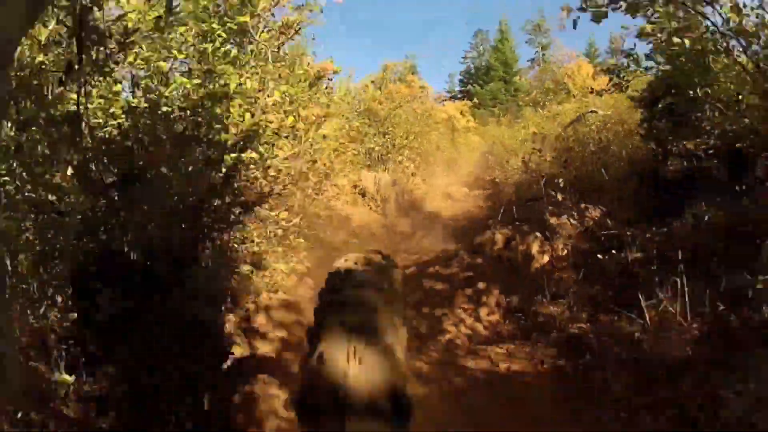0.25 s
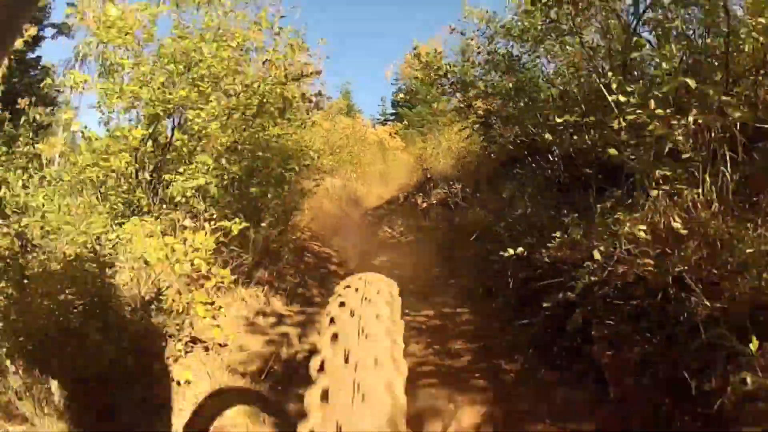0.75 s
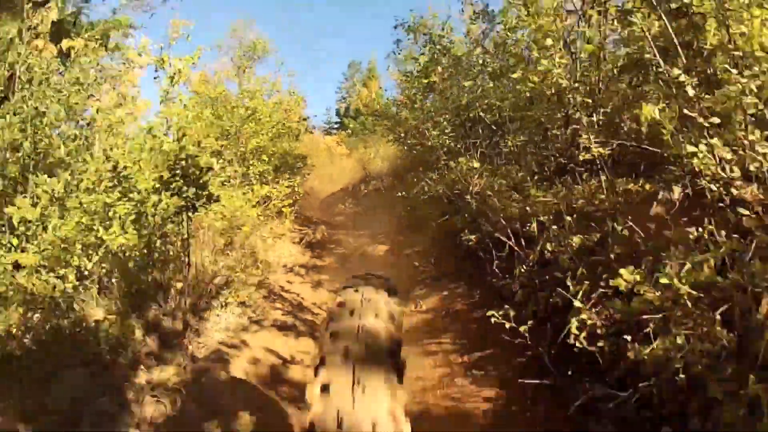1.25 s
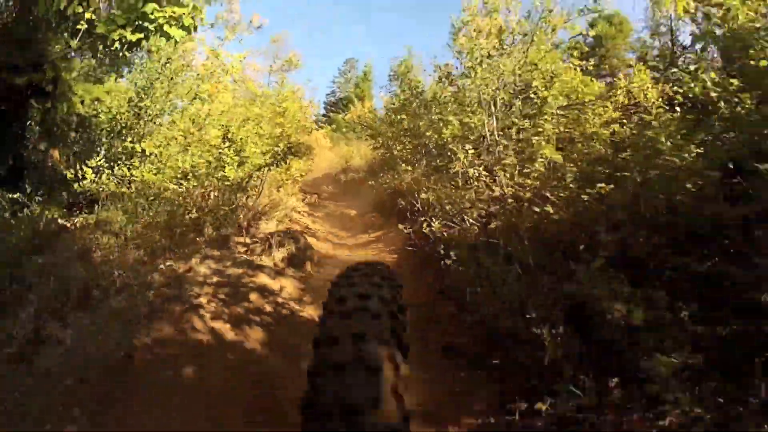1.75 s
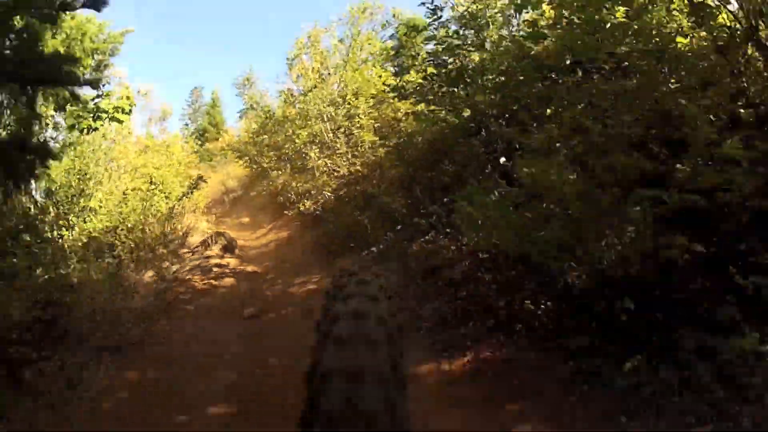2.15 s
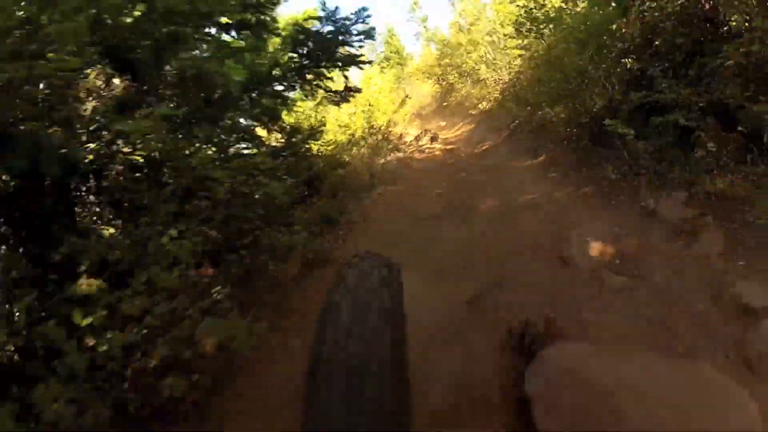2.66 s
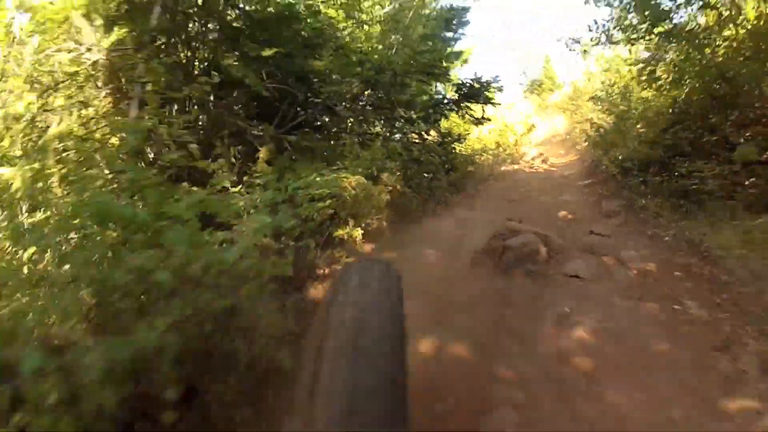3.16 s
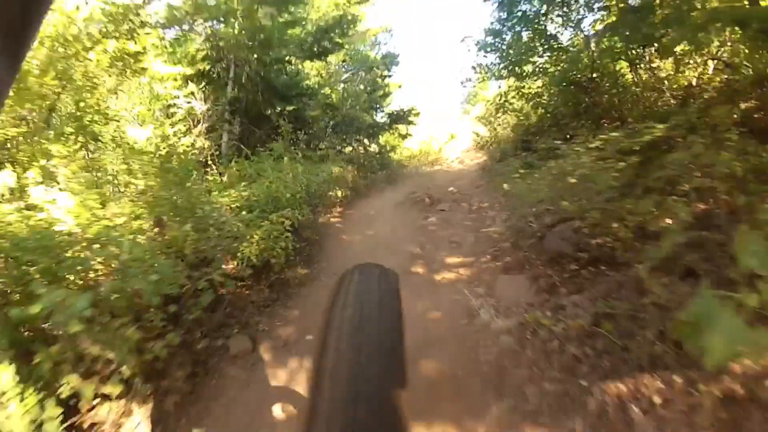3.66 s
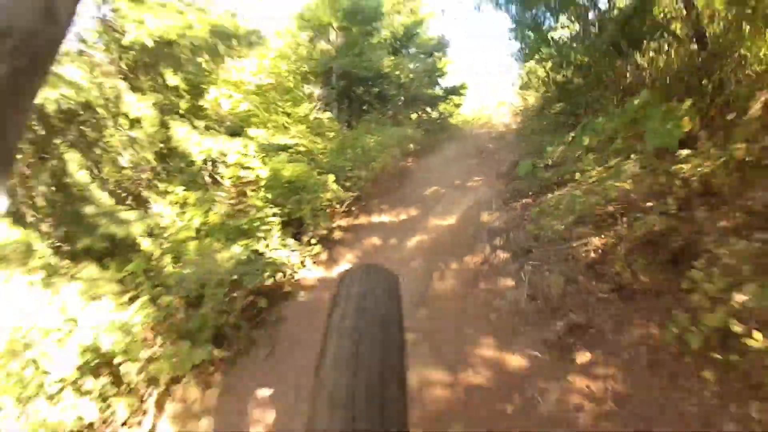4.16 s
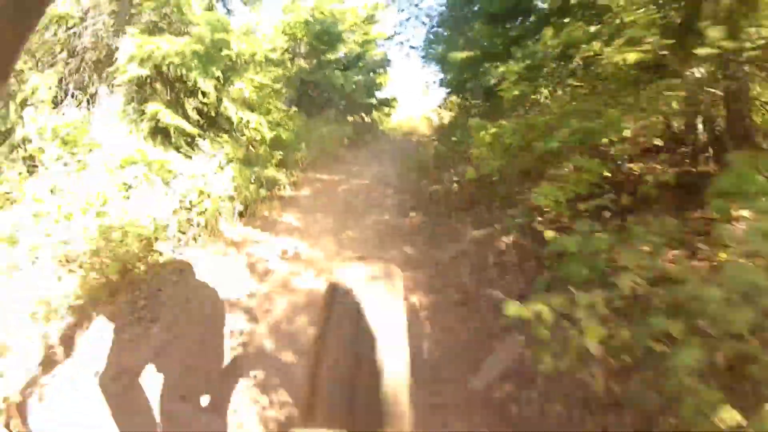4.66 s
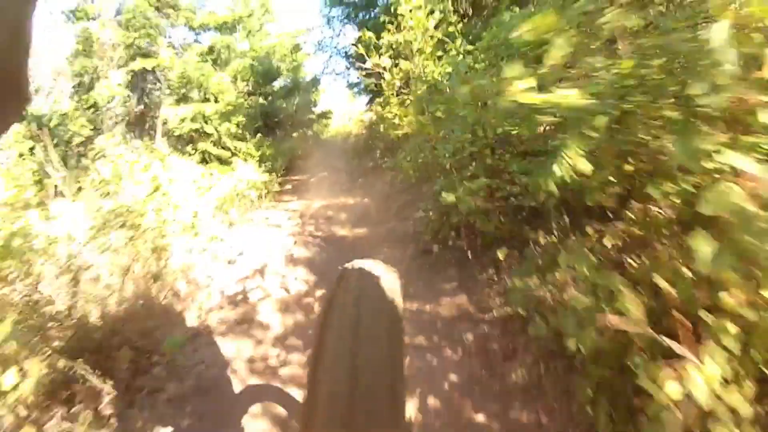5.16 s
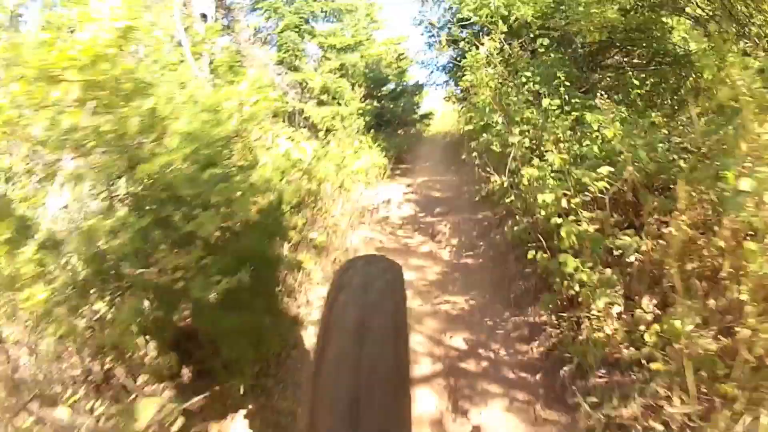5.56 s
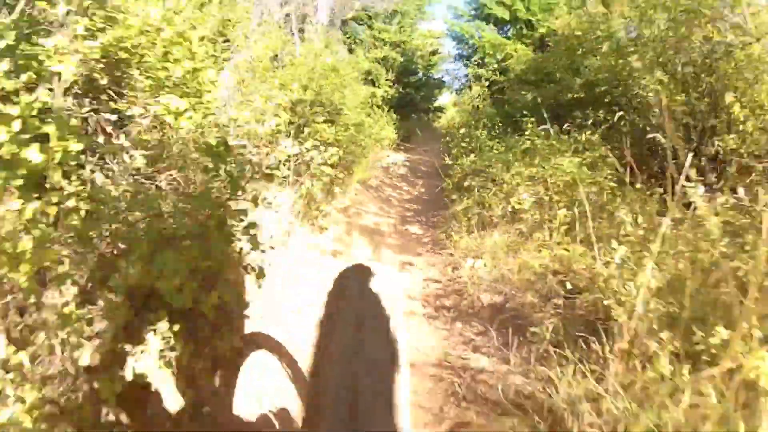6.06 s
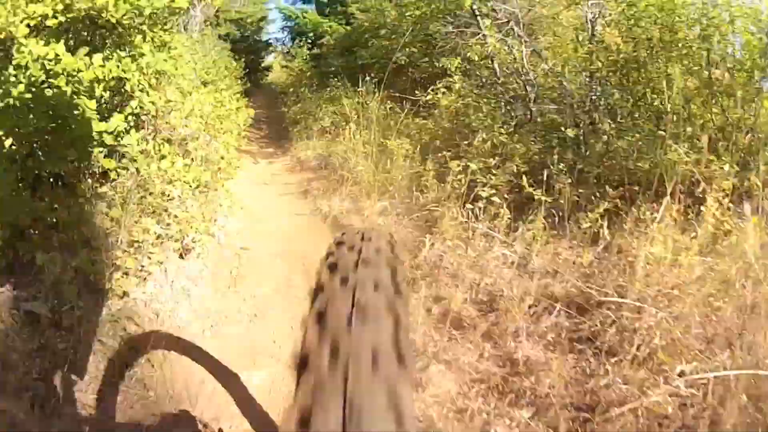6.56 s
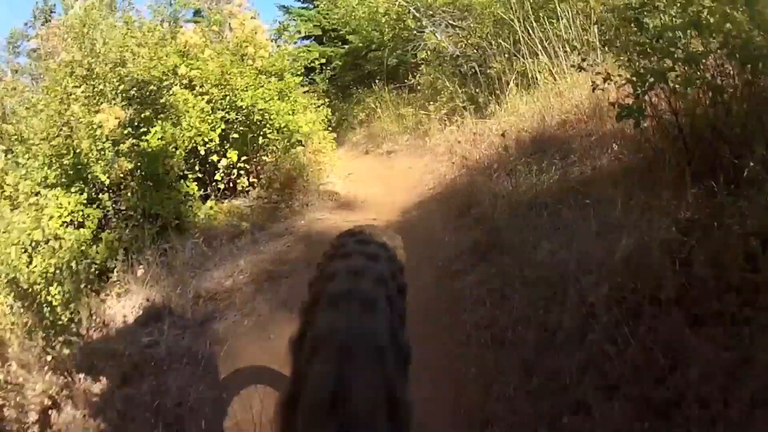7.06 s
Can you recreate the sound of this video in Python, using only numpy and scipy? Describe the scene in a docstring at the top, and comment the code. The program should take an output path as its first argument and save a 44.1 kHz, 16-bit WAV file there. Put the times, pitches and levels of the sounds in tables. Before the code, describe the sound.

A bicycle rolls fast over a dry dirt trail for about seven seconds, heard close from a microphone mounted on it. The tyre makes a continuous hollow rumble with a gravelly crunch, swelling around 1.5 and 2 seconds, over a low shudder from the bike. Loose parts clack and ring metallically from the start, in dense, uneven clusters until about 2.7 seconds and again from 4 to 5.8. Bumps knock the microphone's plastic case throughout, some with a dull thud, hardest around 1.1, 1.6, 3, 3.7, 4.6 and 6.6 seconds. The tyre briefly scrapes the dirt near 0.3, 1.9, 4.4 and 5.6 seconds. Wind buffets the microphone in low gusts, with a short push at 2.7 seconds. From about 6 seconds it grows stronger and briefly flutters while the rattles thin out, with one more sharp clatter at 7 seconds.

```python
"""A bicycle tyre rumbles and crunches down a dry dirt trail, heard from a camera riding on the bike.
Bumps come up through the frame and make the camera's plastic case ring. Loose parts rattle,
the tyre scrapes the dirt, the frame shakes, and wind buffets the microphone.
The camera turns itself down after loud blows. It also samples slowly and holds each sample,
which mirrors the sound into the treble."""
import sys
import numpy as np
from scipy import signal
from scipy.fft import rfft, irfft
from scipy.io import wavfile
from scipy.ndimage import uniform_filter1d

SR = 44100
rng = np.random.default_rng(int(sys.argv[2]) if len(sys.argv) > 2 else 0)


def generate_wav(signal):
    """Clip the signal to [-1, 1] and save it as 16-bit WAV at the path in sys.argv[1]."""
    frames = np.transpose(np.atleast_2d(signal))
    scaled = np.clip(frames, -1, 1) * 32767
    pcm = np.round(scaled).astype(np.int16)
    wavfile.write(sys.argv[1], SR, pcm)


N = 321930
T = np.arange(N) / SR

# How loud the tyre is along the trail: time_s, rumble_db, crunch_db
TYRE_LEVELS = [(0.0, -27, -34), (0.43, -21.5, -28.5), (0.69, -23.5, -33), (1.3, -18.5, -31.5),
               (1.57, -16.5, -25.5), (1.77, -24, -33), (2.01, -16.5, -25), (2.22, -23.5, -35),
               (2.5, -21.5, -28.5), (2.91, -23.5, -33), (3.39, -21.5, -29), (3.94, -23, -33.5),
               (4.11, -22, -32.5), (4.41, -19, -29.5), (4.74, -22.5, -32), (5.0, -22.5, -31),
               (5.22, -26.5, -29), (5.35, -29.5, -38.5), (5.57, -22.5, -30.5), (5.77, -22.5, -33),
               (6.04, -22.5, -31.5), (6.38, -21.5, -32.5), (6.69, -22.5, -35.5), (7.3, -20.5, -30)]
# The tone of crunching gravel: pitch_hz, level_db
GRAVEL_SPECTRUM = [(80, -53), (150, -11), (400, -19), (1000, -41), (1700, -10), (2450, -15), (3300, -22),
                   (4300, -31.5), (5950, -69)]
# The tone of hissing dust: pitch_hz, level_db
DUST_SPECTRUM = [(1500, -37), (2800, -7), (3700, 10), (4400, -14), (5200, 8), (6500, -23)]
# Bumps that knock the case: time_s, peak_db, push_hz, thud_db (the thud peaks thud_db + 10 above peak_db)
BUMPS = [(0.021, -12, 656, -32.5), (0.051, -8, 875, -43.5), (0.338, -16.5, 720, -6), (0.363, -17, 706, -1),
         (0.528, -10.5, 727, -18.5), (0.66, -2.5, 673, -18), (0.836, -11, 686, -17), (1.076, 0.5, 695, -51),
         (1.155, -8.5, 660, -20.5), (1.238, -5.5, 770, -25), (1.252, 0, 765, -29), (1.476, -5.5, 664, -19),
         (1.597, 0.5, 678, -47), (1.83, -11, 710, -20), (1.903, -13, 686, -25), (1.969, -4, 653, -28),
         (2.856, -5, 655, -24.5), (2.962, -6, 710, -22.5), (3.019, 2.5, 718, -29), (3.291, -7.5, 674, -19),
         (3.522, -13.5, 656, -10), (3.704, 1.5, 761, -17), (3.757, 0.5, 783, -48), (3.988, -1, 768, -13.5),
         (4.323, -2.5, 595, -25), (4.387, -5.5, 673, -23), (4.567, -3, 890, -15.5), (4.631, 3.5, 796, -30),
         (4.804, -7, 657, -40), (4.874, 0, 744, -22), (4.932, -5.5, 693, -43), (5.159, -3, 690, -28),
         (5.416, 0.5, 748, -41), (5.626, -6.5, 697, -17.5), (5.81, -3.5, 677, -13), (6.011, 0, 675, -34),
         (6.391, -8, 710, -26.5), (6.566, 1.5, 730, -21.5), (6.753, -2.5, 647, -21),
         (6.767, -2, 657, -22.5), (6.812, -7, 657, -20), (6.908, -8, 730, -10), (7.283, -3, 687, -15.5)]
# The louder slaps of loose parts: start_s, metal_peak_db, clack_above_metal_db
SLAPS = [(0.0189, -21, 14.5), (0.0298, -16, 5), (0.0486, -1, -1), (0.1096, -16, 3), (0.1519, -10, -7),
         (0.2039, -14, 4.5), (0.2158, -19.5, 8.5), (0.2404, -15.5, -10), (0.2728, -16, 2.5),
         (0.3232, -13, 2), (0.3519, -7, -2), (0.3614, -24.5, 19), (0.408, -20.5, 8), (0.4489, -14, -4),
         (0.4627, -8.5, 4.5), (0.5202, -15, -6), (0.5511, -17, -1.5), (0.5717, -17, 1.5),
         (0.6549, -23.5, 12), (0.666, -2.5, -4.5), (0.7796, -20.5, 4.5), (0.8335, -6, -3.5),
         (0.893, -15, -2), (0.94, -22.5, 9.5), (1.0051, -5, 0), (1.3892, -14, -3), (1.514, -12.5, 3),
         (1.732, -16, 2), (1.8161, -33, 17.5), (1.8257, -23, 18.5), (1.8392, -5, -5), (1.925, -13.5, 5),
         (1.9602, -13, 3.5), (1.985, -8, 0.5), (1.9936, -11.5, 3), (2.0628, -12.5, 3.5), (2.115, -4, -9),
         (2.1241, -18.5, 6.5), (2.134, -11, -5.5), (2.16, -17.5, 2.5), (2.1903, -17, 6), (2.2054, -10, 0.5),
         (2.4005, -27.5, 19.5), (2.4177, -4, -5), (2.4797, -18, 9), (2.5461, -14, 7), (2.6042, -6.5, -10.5),
         (2.6389, -5, -6), (2.6625, -2.5, -3.5), (2.758, -20, 11.5), (2.9163, -15.5, -10.5),
         (3.1757, -16, 4.5), (3.2204, -14.5, 5.5), (3.2874, -24.5, 12), (3.3413, -18, -4),
         (3.4035, -16, -15.5), (3.5179, -23, 10.5), (3.7031, -12, 8), (3.9811, -18, 14), (4.004, -8, 2),
         (4.0637, -17, 2.5), (4.151, -10, -1), (4.2117, -14, -5.5), (4.3027, -17, 0), (4.3274, -18, 11.5),
         (4.384, -18.5, 3.5), (4.566, -14, 14.5), (4.621, -14.5, 8), (4.645, -11, -0.5),
         (4.7431, -16.5, -23), (4.7681, -24, 4), (4.796, -9.5, 0), (4.8709, -16, 7.5), (4.8862, -19, 8),
         (4.9365, -9, -1), (5.021, -12, -15.5), (5.0714, -8, 2.5), (5.1493, -19.5, 11.5), (5.1621, -3, 2),
         (5.2625, -9, -2), (5.327, -16, 5), (5.3502, -16.5, -1), (5.3902, -16.5, 1), (5.4063, -12, -1),
         (5.4136, -10.5, -1), (5.5281, -18, -9), (5.6101, -5.5, -4), (5.662, -9.5, 3.5), (5.7917, -13, -3),
         (6.1452, -34.5, 19), (6.4075, -24, 9.5), (6.535, -25, 9.5), (6.9098, -21, 9), (6.9306, -9, 1.5),
         (6.9935, -32.5, 19), (7.0376, -2.5, 1.5)]
# The tyre scraping the dirt: start_s, length_s, level_db
SCRAPES = [(0.333, 0.11, -25.5), (1.933, 0.12, -27), (4.438, 0.082, -30), (5.605, 0.078, -24)]

# A mode is a pitch at which a thing rings; the narrower it is, the longer it rings.
# Modes of the plastic case: pitch_hz, width_hz, level_db
CASE_MODES = [(662, 43, 0.5), (755.6, 32.7, -3.5), (848, 108, -8.5), (330.7, 31, -17.5), (1182, 22, -13.5)]
# Modes of the dull thud under a bump: pitch_hz, width_hz, level_db
THUD_MODES = [(171, 46, 2.5), (346, 16.3, 2.5), (469, 24.5, 2.5)]
# Modes of the clack of loose parts: pitch_hz, width_hz, level_db
CLACK_MODES = [(1305, 386, -9.5), (2028, 206, 4), (2122, 200, 2.5), (2492, 210, 2.5), (3022, 71, -3.5)]
# Modes of ringing metal: pitch_hz, width_hz, level_db
METAL_MODES = [(3468, 116, 19.5), (4010, 190, 7), (4722, 197, 11.5), (5280, 120, 1), (5090, 130, 7.5)]

# How loud the low 73 Hz rumble is (frame shake, plus wind buffeting during gusts): time_s, level_db
LOW_RUMBLE_LEVELS = [(0.0, -34), (0.04, -16.5), (0.14, -43), (0.32, -27.5), (0.87, -32.5), (1.0, -20),
                     (1.22, -30), (1.46, -16), (1.67, -35.5), (1.71, -24), (1.95, -19.5), (2.01, -36),
                     (2.56, -27.5), (4.92, -29), (5.06, -21.5), (5.16, -42.5), (5.9, -16.5), (6.1, -26),
                     (6.24, -20), (6.63, -24.5), (7.03, -20), (7.05, -37), (7.26, -26), (7.3, -27)]
# The tone of wind on the microphone: pitch_hz, level_db
WIND_SPECTRUM = [(18, -4), (30, -14.5), (42, -0.5), (55, -10), (100, -12.5), (180, -18), (320, -23),
                 (600, -56)]
# How loud the wind is on the microphone: time_s, level_db
GUST_LEVELS = [(0.0, -25.5), (0.26, -38), (0.32, -23), (0.43, -39), (1.0, -26), (1.24, -29), (1.44, -34),
               (2.62, -28), (2.66, -12.5), (2.7, -34.5), (3.17, -21), (3.58, -20.5), (4.11, -36),
               (4.33, -22), (4.37, -38), (5.61, -30.5), (5.9, -21.5), (6.46, -17.5), (6.75, -17.5),
               (6.79, -23.5), (7.03, -15), (7.08, -19), (7.26, -13), (7.3, -28.5)]


def tyre():
    """Tread and stones jolt the case in small uneven kicks; gravel crunches in clumps over hissing dust."""
    kicks = rng.standard_normal(N) * flicker(db=2.22, ms=5.5) * flicker(db=2.23, ms=25)
    rumble = unit_level(ring(filtered(kicks, [300, 1500], "bandpass"), CASE_MODES))
    grit = shaped_noise(GRAVEL_SPECTRUM) * flicker(db=2.8, ms=4) * flicker(db=2.6, ms=20)
    gravel = unit_level(grit + 0.071 * ring(grit, CLACK_MODES + METAL_MODES))
    crunch = gravel + gain_of(-15.5) * shaped_noise(DUST_SPECTRUM)
    rumble_db, crunch_db = level_curve(TYRE_LEVELS), level_curve(TYRE_LEVELS, column=2)
    return gain_of(rumble_db) * rumble + gain_of(crunch_db) * crunch


def bumps():
    """Each bump gives a short, rough push, then the case rings on over a dull thud."""
    out, t = np.zeros(N), T[:3000]
    swell = np.exp(-((t - 0.008) / 0.0029) ** 2)
    for time_s, peak_db, push_hz, thud_db in BUMPS:
        grit = rng.standard_normal(len(t))
        push = (np.sin(2 * np.pi * push_hz * t) + 0.46 * grit) * swell
        soft_push = uniform_filter1d(push, size=21)
        thud = ring(uniform_filter1d(grit * swell, size=45), THUD_MODES)
        start_s = time_s - 0.005
        add(out, start_s, peak_db, ring(soft_push, CASE_MODES) + 0.9 * soft_push)
        add(out, start_s, peak_db + thud_db + 10, thud)
    return out


def rattles():
    """Loose parts slap: each dry snap with a gritty tail sets off a metal ring, a clack and the case."""
    out, t = np.zeros(N), T[:2500]
    snap = (np.exp(-t / 0.0042) + 0.47 * np.exp(-t / 0.0077)) * np.minimum(t / 0.00022, 1)
    for start_s, metal_db, clack_above_db in SLAPS + small_slaps():
        blow = snap * rng.standard_normal(len(t))
        shifts = rng.standard_normal((len(CLACK_MODES), 2))
        metal = ring(blow, struck(METAL_MODES, shifts))
        clack = ring(blow, struck(CLACK_MODES, shifts[::-1]))
        clack_db = metal_db + clack_above_db
        add(out, start_s, metal_db, metal + 0.3 * filtered(blow, [2500, 5600], "bandpass"))
        add(out, start_s, clack_db, clack + 0.12 * filtered(blow, [900, 3000], "bandpass"))
        add(out, start_s, clack_db + 0.5, ring(blow, CASE_MODES))
    return out


def small_slaps():
    """Quiet slaps at random moments, more of them on loose gravel; rows as in SLAPS."""
    tries, usual_per_s, usual_crunch_db = 400, 16, -33
    when, chance, size, clack = rng.random((tries, 4)).T
    start_s = when * T[-1]
    crunch_db = level_curve(TYRE_LEVELS, column=2)[(start_s * SR).astype(int)]
    per_s = usual_per_s * gain_of(1.1 * (crunch_db - usual_crunch_db))
    metal_db = -30.5 - 2.5 * np.log(1 - 0.95 * size)
    clack_above_db = 4 + 5 * (2 * clack - 1)
    happens = chance < per_s * T[-1] / tries
    return list(np.transpose([start_s, metal_db, clack_above_db])[happens])


def scrapes():
    """The tyre scrapes the dirt: short bursts of dense grit set the clack modes ringing."""
    grit = rng.standard_normal(N) * flicker(db=4.2, ms=2.6)
    bursts = sum(gain_of(db) * arch(start_s, length_s) for start_s, length_s, db in SCRAPES)
    return bursts * unit_level(ring(grit, CLACK_MODES))


def low_rumble():
    """A low rumble: the frame shaking at its lowest mode, plus wind buffeting during gusts."""
    pitch_hz, narrow_hz, wide_hz = 73, 13, 40
    rumble = ring(rng.standard_normal(N), [(pitch_hz, narrow_hz, 0)])
    rumble = ring(rumble, [(pitch_hz, wide_hz, 0)])
    return gain_of(level_curve(LOW_RUMBLE_LEVELS)) * steadied(rumble, ms=47)


def wind():
    """Gusts press on the microphone in low, lumpy pushes."""
    air = steadied(shaped_noise(WIND_SPECTRUM), ms=77)
    air = air + 0.12 * (air ** 2 - 1)  # pushes are taller than dips
    air = filtered(air, 25, "highpass")  # the microphone drops the slowest part
    return gain_of(level_curve(GUST_LEVELS)) * unit_level(air)


def wind_flutter():
    """During one strong gust the air beats almost evenly on the microphone."""
    beat_hz = 40.98 * flicker(db=1.2, ms=40.4)
    phase = 2 * np.pi * np.cumsum(beat_hz) / SR
    beats = unit_level(np.cos(phase) + 0.25 * np.cos(2 * phase))
    return gain_of(-15) * arch(start_s=5.97, length_s=0.76) * flicker(db=1.6, ms=30) * beats


def ring(x, modes):
    """Lets x set the modes ringing; each one dies away by itself."""
    out = np.zeros(len(x))
    for k, (pitch_hz, width_hz, db) in enumerate(modes):
        decay = np.exp(-np.pi * width_hz / SR)
        turn = np.exp(2j * np.pi * pitch_hz / SR)
        ringing = 2 * signal.lfilter([1 - decay], [1, -decay * turn], x).real
        out += (-1) ** k * gain_of(db) * ringing
    return out


def struck(modes, shifts):
    """Every blow lands somewhere new, so the modes shift a little in pitch and strength."""
    return [(hz * (1 + 0.009 * pitch_shift), width_hz, db + 2.64 * level_shift)
            for (hz, width_hz, db), (pitch_shift, level_shift) in zip(modes, shifts)]


def shaped_noise(spectrum):
    """Noise with the tone given by a spectrum table."""
    pitch_hz, level_db = np.transpose(spectrum)
    all_hz = np.fft.rfftfreq(N, 1 / SR)
    all_db = np.interp(np.log(all_hz + 1), np.log(pitch_hz + 1), level_db)
    return unit_level(irfft(rfft(rng.standard_normal(N)) * gain_of(all_db), N))


def flicker(db, ms):
    """A multiplier that wanders by about db decibels over about ms milliseconds."""
    width = round(ms * SR / 1000)
    drift = uniform_filter1d(uniform_filter1d(rng.standard_normal(N), width), width)
    return gain_of(db * unit_level(drift))


def steadied(x, ms):
    """Softens the chance swells of a noise over about ms milliseconds."""
    nearby_power = uniform_filter1d(x ** 2, round(ms * SR / 1000))
    return unit_level(x / np.sqrt(nearby_power + 0.42 * np.mean(x ** 2)))


def arch(start_s, length_s):
    """A level that rises and falls once."""
    return np.sqrt(np.sin(np.pi * np.clip((T - start_s) / length_s, 0, 1)).clip(0))


def level_curve(table, column=1):
    """Joins a table's points into a level in dB at every sample."""
    rows = np.array(table)
    return np.interp(T, rows[:, 0], rows[:, column])


def filtered(x, hz, kind, order=2):
    """Keeps the part of x below, above or between the pitches in hz."""
    return signal.sosfilt(signal.butter(order, hz, kind, fs=SR, output="sos"), x)


def add(mix, start_s, peak_db, sound):
    """Lays one sound into the mix."""
    part = mix[round(start_s * SR):][:len(sound)]
    part += gain_of(peak_db) * sound[:len(part)] / abs(sound).max()


def gain_of(db):
    """Turns decibels into a multiplier."""
    return 10 ** (np.asarray(db) / 20)


def unit_level(x):
    """Scales x to an average power of 1."""
    return x / np.sqrt(np.mean(x ** 2) + 1e-20)


def scene():
    """All the sounds of the ride, added into one channel."""
    return (wind() + wind_flutter() + low_rumble() + tyre() + scrapes() + bumps() + rattles())[None]


def record(dry):
    """The camera turns down after loud blows, clips the peaks and holds each slow sample."""
    limit_db, recovery_db_per_s = -10, 61
    camera_rate_hz, hold_steps, top_hz = 12000, 4, 15200
    sensed = filtered(dry[0], 200, "highpass")  # the volume control ignores the wind's low rumble
    power_db = 10 * np.log10(abs(uniform_filter1d(sensed ** 2, 130, origin=64)) + 1e-12)
    recovery_db = T * recovery_db_per_s
    fading_peak_db = np.maximum.accumulate(power_db + recovery_db) - recovery_db
    over_db = np.maximum(fading_peak_db - limit_db, 0)
    turned_down = dry[0] / gain_of(0.86 * uniform_filter1d(over_db, 131, origin=65))
    dulled = filtered(turned_down, 5500, "lowpass", order=6)
    slow = np.clip(signal.resample(dulled, N * camera_rate_hz // SR), -0.95, 0.95)
    held = signal.resample(np.repeat(slow, hold_steps), N)  # the steps mirror the sound into the treble
    top_cut = signal.firwin(161, top_hz, window=("kaiser", 9), fs=SR)
    return signal.oaconvolve(held, top_cut, "same")[None]


dry = scene()
out = record(dry)
generate_wav(out)
```